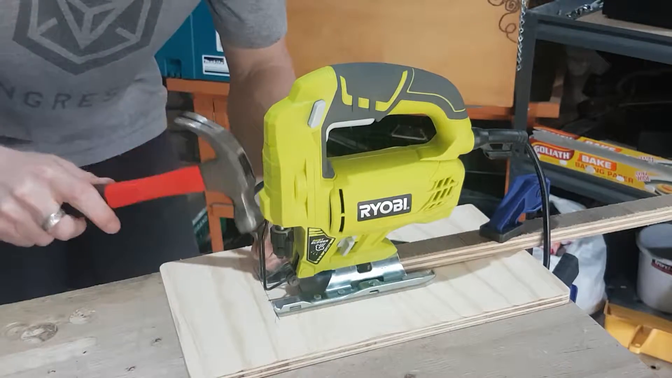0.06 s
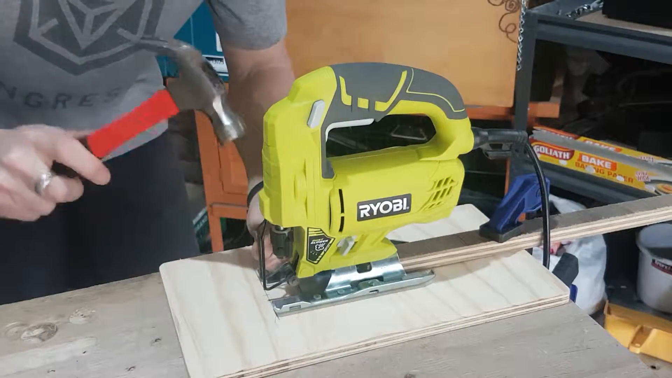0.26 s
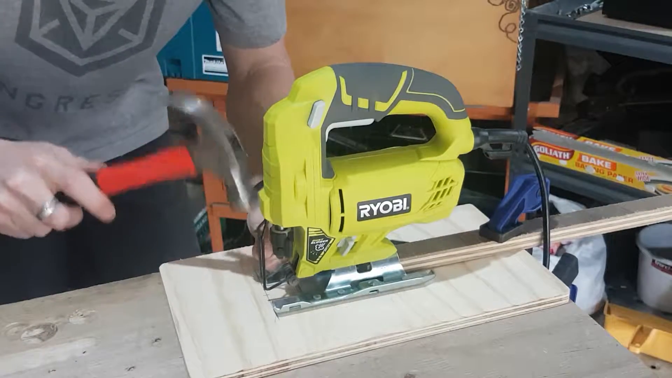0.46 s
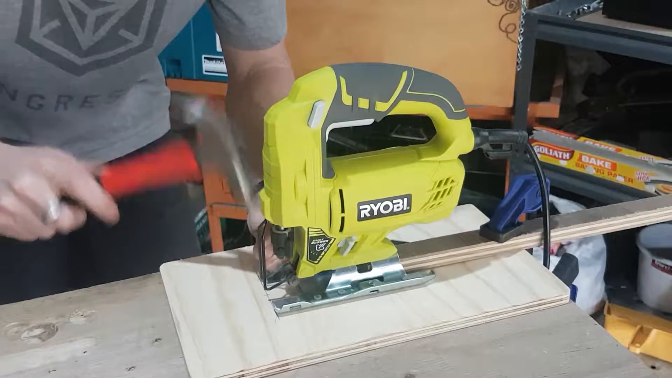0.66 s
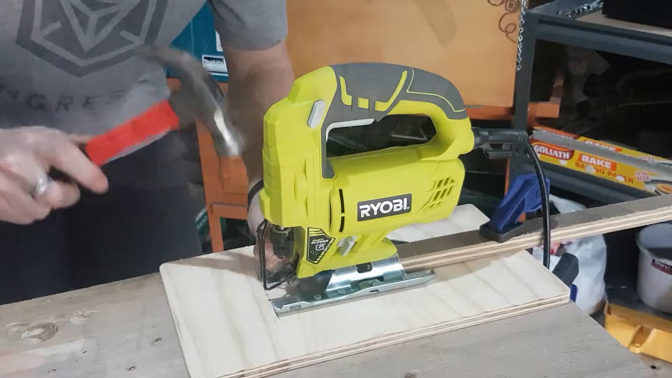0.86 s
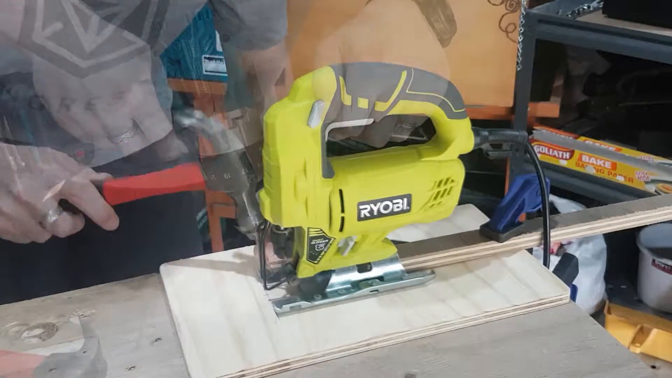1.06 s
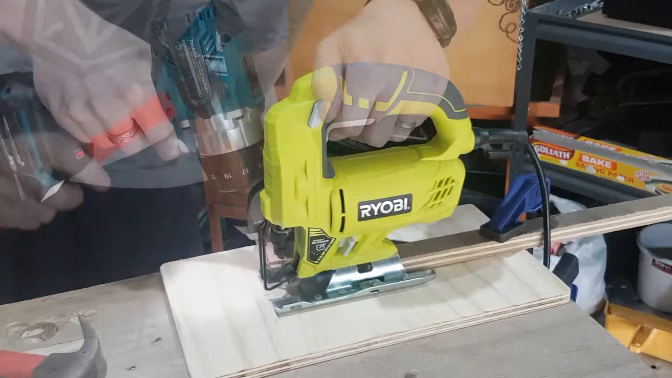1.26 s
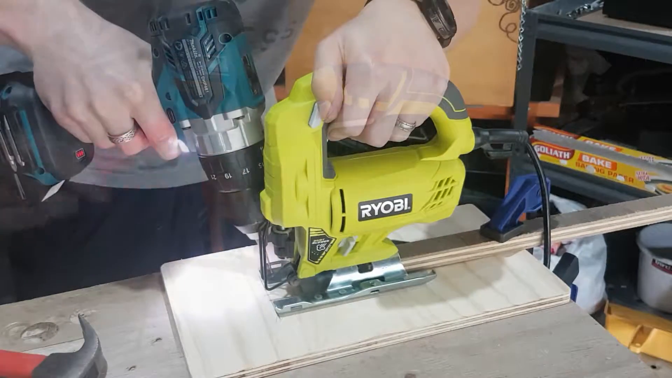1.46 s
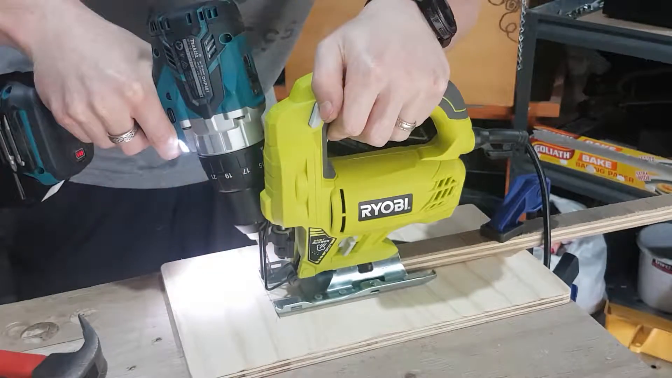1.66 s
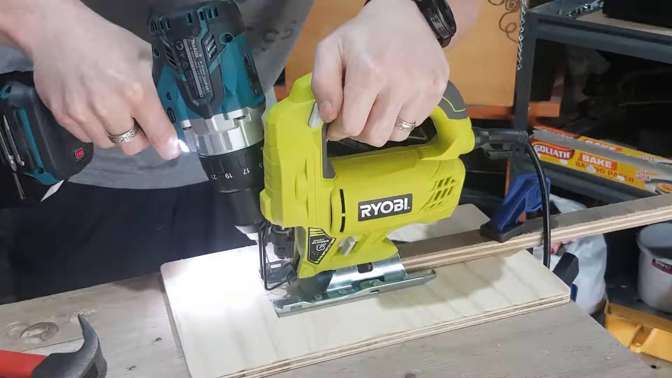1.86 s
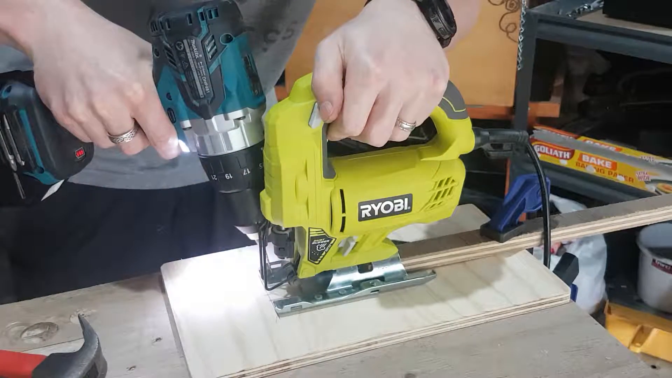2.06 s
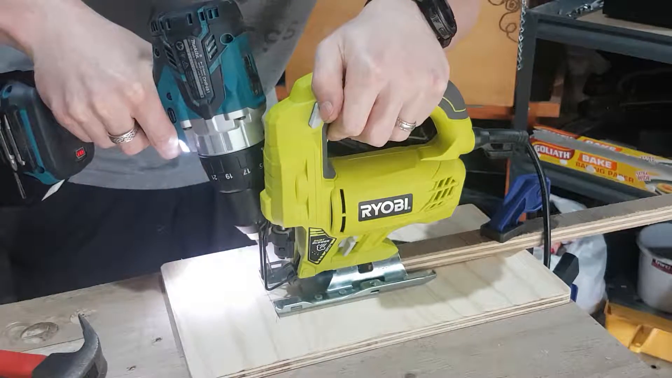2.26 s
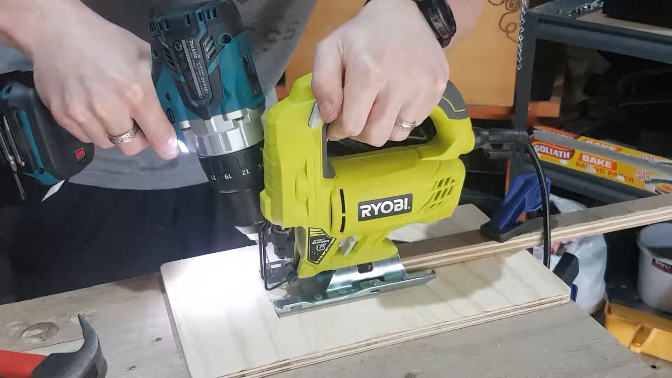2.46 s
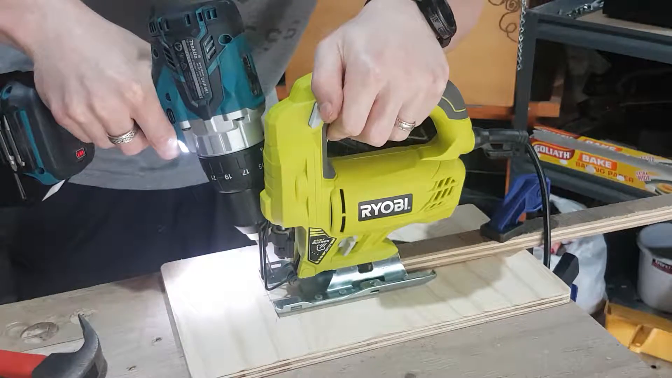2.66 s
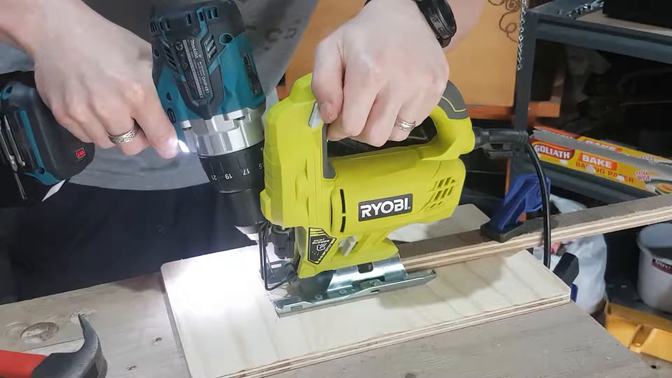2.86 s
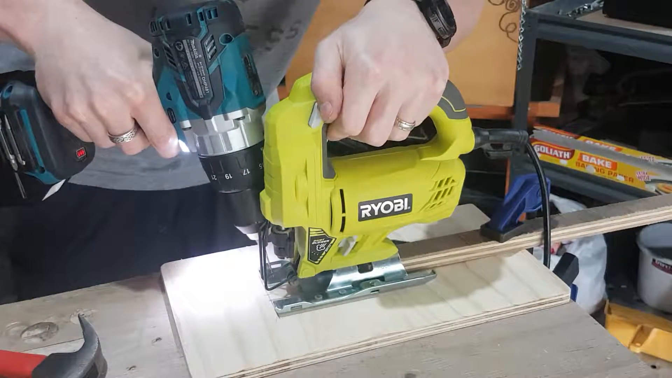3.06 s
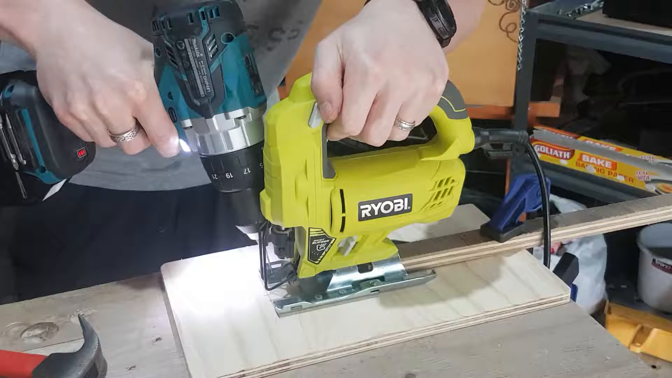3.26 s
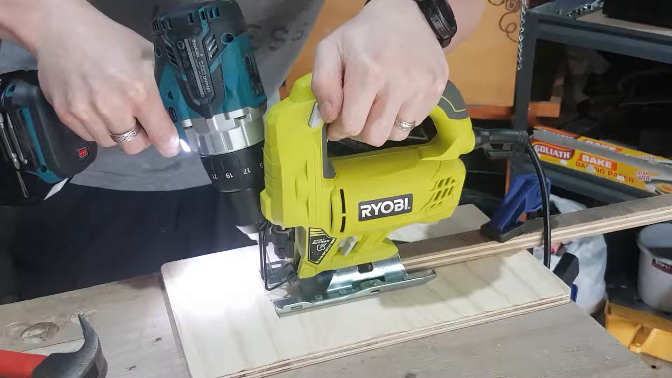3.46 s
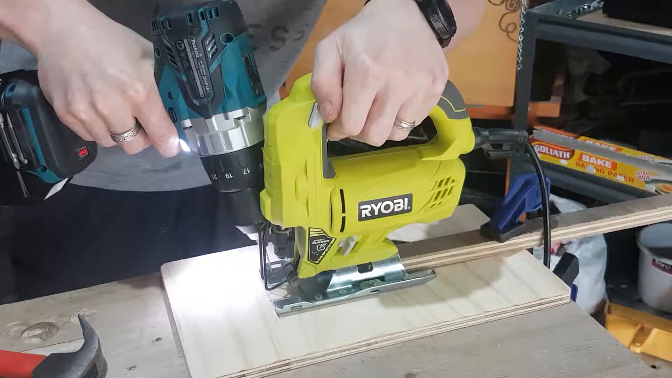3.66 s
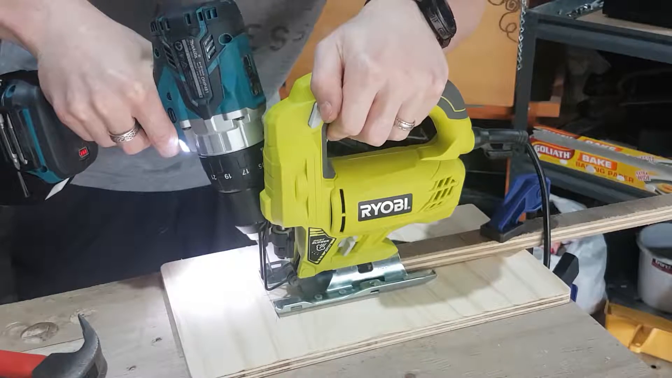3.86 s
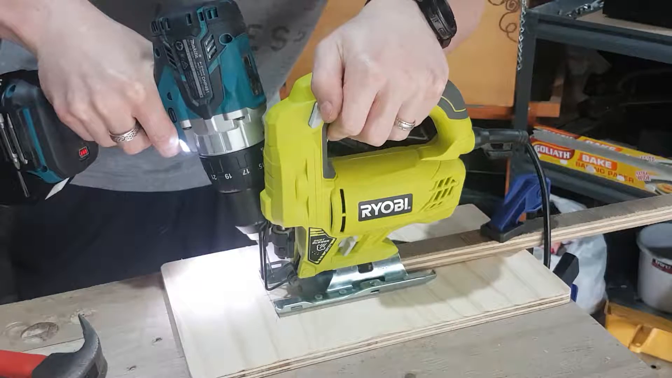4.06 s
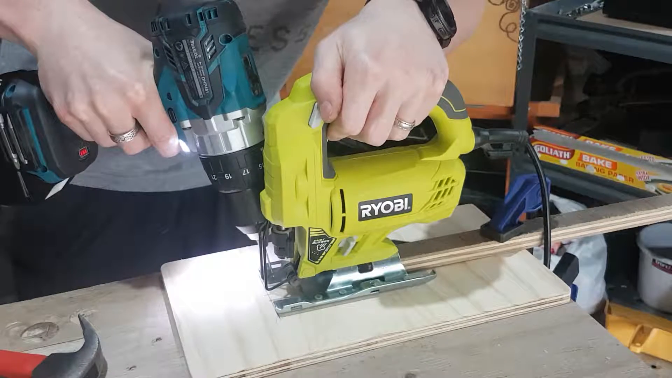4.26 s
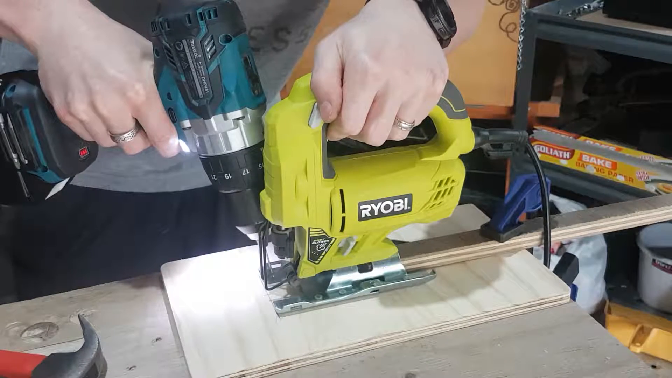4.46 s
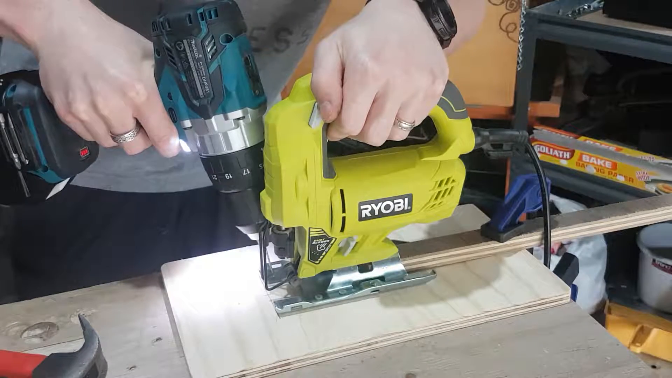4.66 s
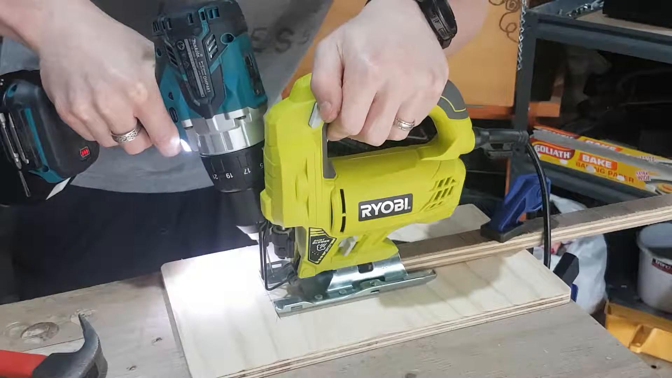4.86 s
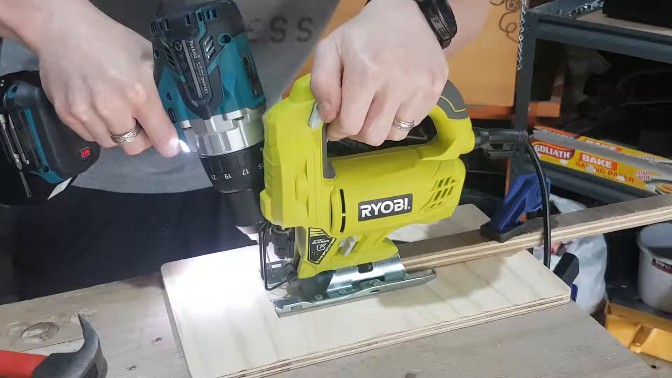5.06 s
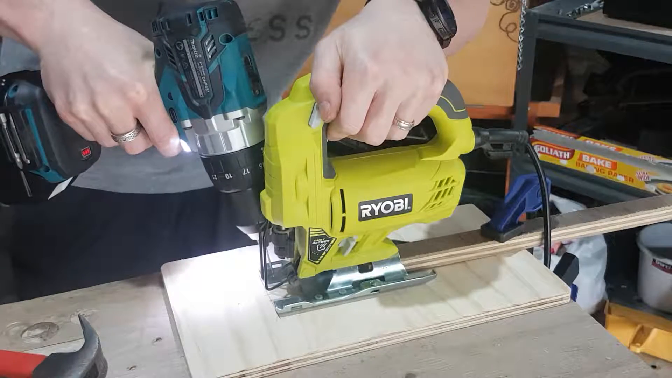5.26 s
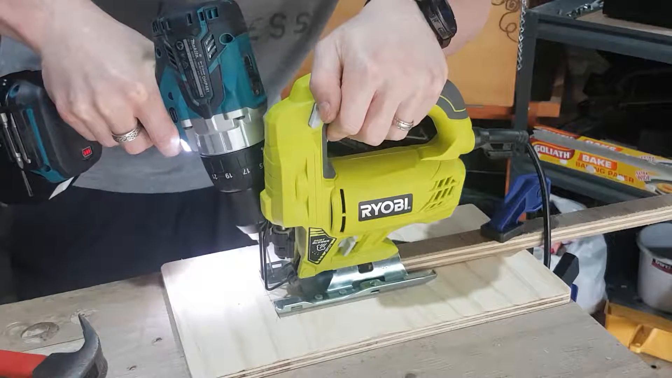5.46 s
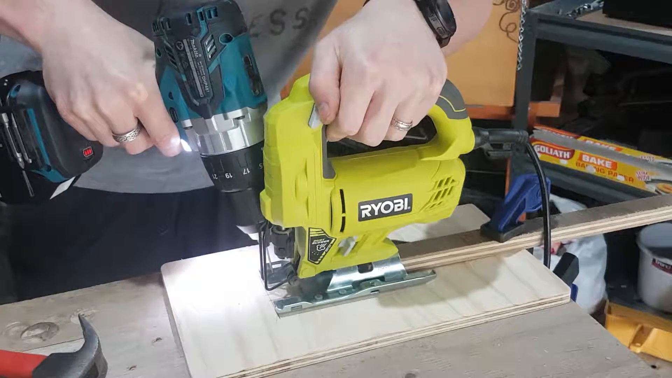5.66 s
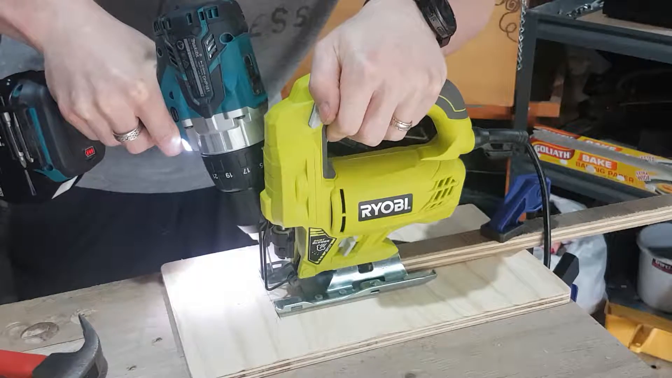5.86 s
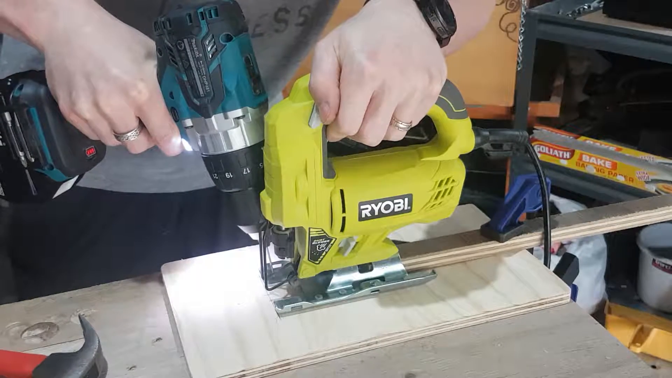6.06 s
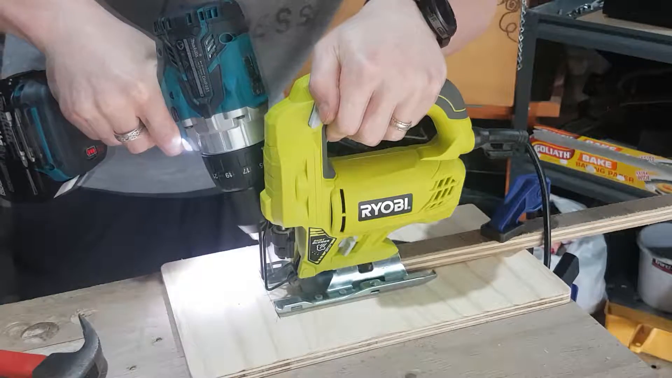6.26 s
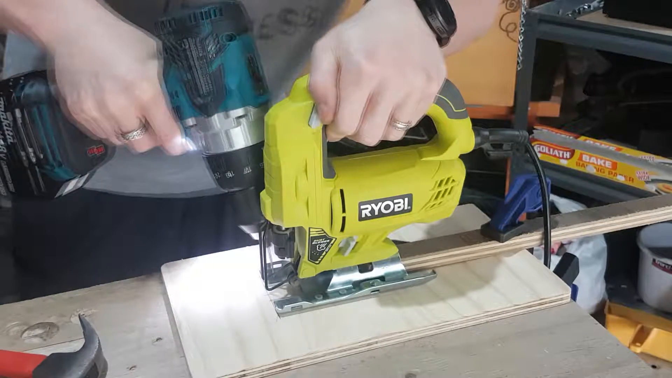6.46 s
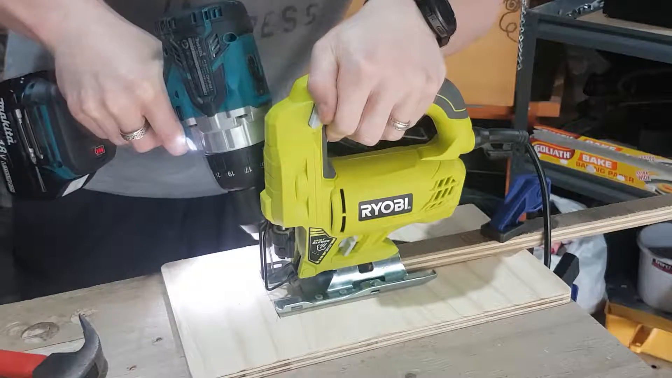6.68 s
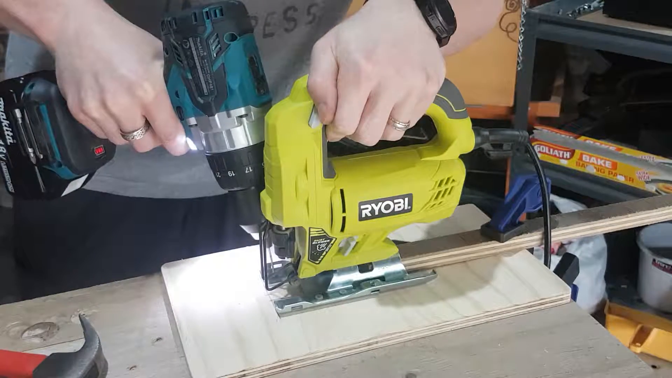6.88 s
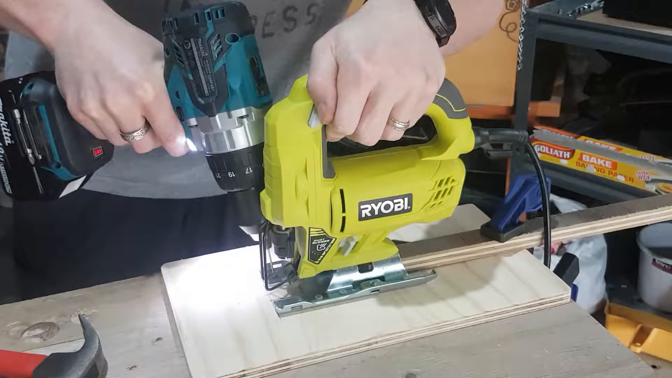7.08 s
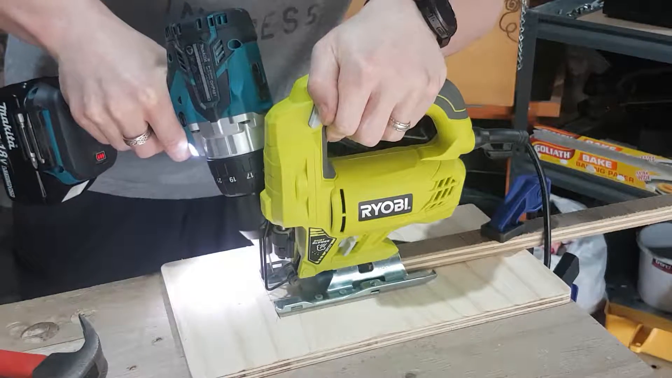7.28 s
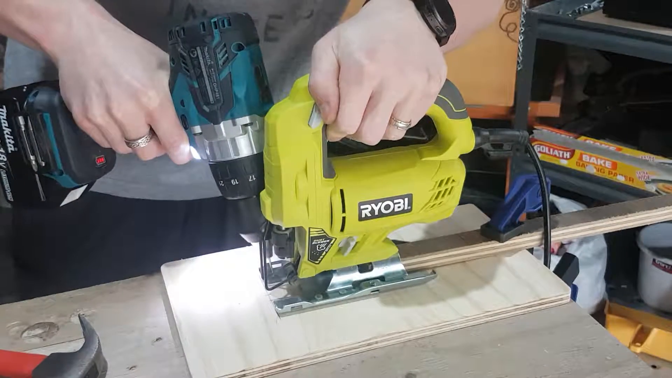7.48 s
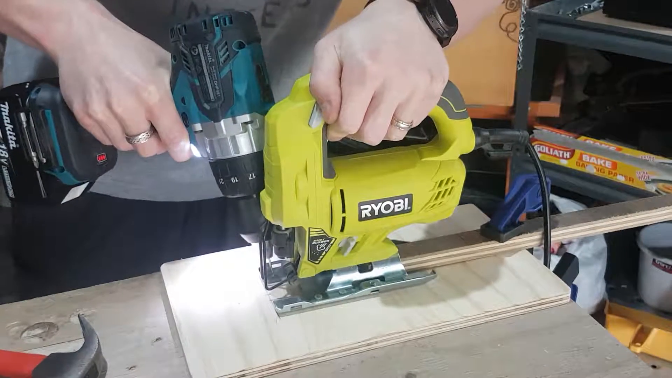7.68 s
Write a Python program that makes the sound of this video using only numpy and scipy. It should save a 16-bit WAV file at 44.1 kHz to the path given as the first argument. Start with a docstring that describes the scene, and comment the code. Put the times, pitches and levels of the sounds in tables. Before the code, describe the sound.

Close by, five evenly spaced hammer taps crack against metal, ringing briefly through a workbench and growing softer. After a small rustle and a faint electronic whistle, a cordless drill spins up in four stages, each higher and louder, with gear noise and airy hiss. It holds full speed, dips slightly and wavers while the bit rubs low in the wood and catches once. Quiet workshop room tone lies underneath.

```python
"""In a small workshop a hammer taps five times, ever more lightly, at the front of a jigsaw on a
plywood bench: steel cracks, bench and saw ring, clothes rustle around the last tap. A cordless drill
whistles faintly, then is run up in four trigger steps: motor orders and switching whistle glide with
the speed while gears and cooling fan grow into a bright rush. At full speed a 10 kHz tone turns rough
and flickers, the level dips briefly, and the bit rubs harder in the wood and catches once."""
import sys
import numpy as np
from scipy import signal
from scipy.fft import rfft, irfft, next_fast_len
from scipy.io import wavfile

SR = 44100
rng = np.random.default_rng(int(sys.argv[2]) if len(sys.argv) > 2 else 0)


def store_wav(level_fs):
    """Save 16-bit WAV to argv[1]."""
    pcm = np.round(np.clip(np.atleast_2d(level_fs), -1, 1) * 32767)
    wavfile.write(sys.argv[1], SR, pcm.T.astype(np.int16))


N = 340452
TIME = np.arange(N) / SR

# hammer hits: t/s, level/dB, thump trim/dB, thump f/Hz, metal brightness/dB, low shelf/dB
BLOWS = [(0.1194, 4.5, -20, 64.4, -0.5, 4.5), (0.43, 1, -6, 58, 6.5, 4.5), (0.7498, -2, 0, 146, 4, 3.5),
         (1.072, -4.5, -13, 140, 3, -24.5), (1.397, -12, -28, 140, 4, -25)]
# ringing modes of bench and saw: f/Hz, level/dB, t60/s
BENCH_MODES = [(164, 1, .38), (183, -5, .2), (277, 3, .45), (351, -1, .28), (395, -2, .38), (511, -3, .3),
               (548, -4, .31), (592, -5, .34), (634, -4, .27), (832, -1, .25), (966, -2, .22),
               (1103, -9, .3), (1257, -4, .22), (1360, -10, .28), (1405, -21, .8), (1615, -9, .22),
               (2019, -9, .2), (2180, -13, .21), (2530, -11, .19), (2790, -12, .3), (2955, -13, .2)]
# colour of a hit's clatter in the room: f/Hz, level/dB
CLATTER_EQ = [(50, -24.5), (110, -12), (180, -13), (225, -13), (290, -9), (600, -14), (730, -14.5),
              (1300, -13.5), (2700, -20), (4500, -27), (6500, -30.5), (9500, -39.5), (13000, -40.5),
              (16000, -45.5)]
# reverb time of the room: f/Hz, t60/s
ROOM_T60 = [(60, 0.13), (160, 0.13), (420, 0.51), (1100, 0.32), (2900, 0.33), (7700, 0.29), (15000, 0.39)]

# trigger steps: t/s, target speed/(turns/s), spin-up/s, share of the rise that settles slowly
TRIGGER = [(2.055, 83.3, .1, 0), (2.855, 223, .024, .46), (3.235, 333, .022, .38),
           (4.838, 437.3, .032, .02)]
# motor whine: multiple of the turn rate, level/dB at each trigger step
ORDERS = [(1, -77, -88, -56, -66), (4, -60.5, -55.5, -57, -47), (6, -88, -80, -64, -73.5),
          (7, -71, -79, -72, -66), (8, -55.5, -65, -53.5, -55), (10, -82, -85, -70, -82),
          (12, -63.5, -68, -66, -64), (20, -70, -57.5, -68, -77), (32, -73, -87, -77, -72),
          (40, -72, -84, -81, -90), (42, -73, -84, -90, -90)]
# controller whistle: multiple of the switching rate, motor order, level/dB at each trigger step
SIDEBANDS = [(1, -4, -80, -58, -62, -71), (1, 4, -59.5, -68, -77, -80), (1, -8, -82, -71, -64, -72),
             (1, -16, -77, -58.5, -66, -71), (2, -4, -74, -84, -85, -85)]
# faders for gear noise, fan hiss, gear mesh and high tone: level/dB at each trigger step
GEAR_NOISE_DB = [-53, -46.5, -41.5, -37.5]
FAN_HISS_DB = [-68, -56.5, -47.3, -40]
MESH_DB = [-64.5, -51.5, -48.5, -54.5]
HIGH_TONE_DB = [-74, -63, -56.5, -45]
# colours of the gear noise and the fan hiss: f/Hz, level/dB
GEAR_EQ = [(60, -24), (110, -12), (200, -20.5), (400, -15), (750, -11.5), (1150, -4), (1700, -1.5),
           (2350, -5), (3000, -2), (3900, -4.5), (5300, -5), (6300, -7.5), (9000, -11), (12000, -61)]
FAN_EQ = [(5000, -24), (8500, -7), (10000, -3), (11200, 0.5), (12500, 0.5), (14500, -1), (16000, -4.5)]
# resonances of the drill's body: f/Hz, width/Hz, lift/dB
HOUSING = [(1280, 95, 2), (1650, 90, 1), (1820, 75, 3), (2010, 25, 6.5), (2024, 18, -1), (2840, 140, 1),
           (3030, 17, 5.5), (3664, 5.8, 14), (4500, 73, 5), (5400, 83, 2.5)]
# brief dip of the drill at full speed: t/s, gain/dB
DIP = [(6.1, 0), (6.28, -2), (6.55, -3.5), (6.88, 1)]
# tones swell and fade at full speed: t/s, motor whine/dB, high tone/dB, flicker depth (0-1)
SWELL = [(4.85, 3, -1.5, 0), (5.15, 4, 5, 0.1), (5.75, 2, 1, .2), (6.05, 4, -1, .7), (6.3, 2, -5.5, 1),
         (7.15, -3, 4, 0.64), (7.4, -2.5, -15, 0.6), (7.52, 0.5, -2, 0.3), (7.72, 2, 2, 0.3)]

# colours of the bit in wood, of the wash and rustle, and of the room tone: f/Hz, level/dB
WOOD_EQ = [(40, -18), (110, 0.5), (200, -20.5), (290, 4), (560, -1), (850, -5), (1500, -22.5), (4000, -32)]
WASH_EQ = [(50, 0.5), (120, 8), (200, -1.5), (330, 3), (600, -12), (1500, -9), (3500, -13.5), (7000, -18.5),
           (15000, -29.5)]
SHOP_EQ = [(25, -12.5), (60, -2.5), (110, -0.5), (200, -6), (330, -2.5), (600, -8), (1800, -7), (2300, -11),
           (3400, -8), (6000, -17), (9000, -25.5), (16000, -36)]
# a soft wash around the first hit, then rustles around the last: start/s, end/s, level/dB
WASH_AND_RUSTLES = [(0, .35, -54.5), (1.253, 1.56, -56), (1.559, 1.613, -48)]
# stereo images of room and drill: f/Hz, left-right correlation
ROOM_IMAGE = [(100, 0.94), (300, 0.91), (550, 0.91), (1000, 0.46), (2500, .15), (6000, 0.054), (12000, .5)]
DRILL_IMAGE = [(100, 1), (400, 0.95), (1000, 0.68), (2500, 0.26), (5000, 0.11), (8000, 0.033), (10000, 1),
               (12000, 1)]

SWITCHING_HZ = 7945
JOLT_TONES_DB, JOLT_GEARS_DB = -17, 10   # a jolt ducks the tones and rattles the gears
STRAIN_MOTOR_DB, STRAIN_MESH_DB = -36, 12   # at full strain the whine thins and the teeth sing out


def hammer(ring_db=-25, tail_db=-15, crack_db=-14, crack_s=.00091, thump_db=-18, thump_s=.0054):
    """Each hit layers the contact, a metal crack, a bench thump, ringing modes and the room's tail."""
    out, age = np.zeros((2, N + SR)), np.arange(SR) / SR
    shared_tail = room_tail(age)
    modes = bench_modes(age)
    for t, level_db, thump_trim_db, thump_hz, metal_db, low_db in BLOWS:
        ring = sum(mode * from_db(rng.normal(0, 1)) for mode in modes)
        tail = (shared_tail + room_tail(age)) / np.sqrt(2)
        body = from_db(ring_db) * ring + from_db(tail_db) * tail + contact(age)
        # a light tap hardly moves the bench
        body += (from_db(low_db) - 1) * filtered(body, 240, "low", order=1)
        # each hit has its own treble lift: the lighter taps sound brighter than the first
        body += (from_db(metal_db) - 1) * filtered(body, 4500, "high", order=1)
        sizzle = filtered(rng.standard_normal((2, SR)), [1200, 12000], "band", order=1)
        crack = from_db(crack_db + metal_db) * sizzle * np.exp(-age / crack_s)
        thump = from_db(thump_db + thump_trim_db) * np.sin(2 * np.pi * thump_hz * age)
        hit = filtered(body, 130, "high") + crack + thump * bump(age / thump_s) * pan(5)
        start = round(t * SR)
        out[:, start:start + SR] += from_db(level_db) * hit
    return out[:, :N]


def contact(age, swing_hz=520, swing_s=.00082, clack_hz=1650, clack_s=.00066, grit_s=.00094):
    """The attack as steel lands: a heavily damped swing of the board, a clack and a burst of grit."""
    swing = np.sin(2 * np.pi * swing_hz * age) * np.exp(-age / swing_s)
    clack = from_db(-3) * np.sin(2 * np.pi * clack_hz * age) * np.exp(-age / clack_s)
    grit = filtered(noise(CLATTER_EQ, ROOM_IMAGE, size=SR), 900, "high", order=1)
    return from_db(-11) * grit * np.exp(-age / grit_s) - swing - clack


def bench_modes(age):
    """Bench and saw ring as damped sines whose left and right phases part towards the treble."""
    modes = []
    for hz, db, t60 in BENCH_MODES:
        width_rad = np.arccos(at_hz(ROOM_IMAGE, hz))
        phase = rng.uniform(0, 2 * np.pi) + spread(rng.choice([-1, 1]) * width_rad)
        modes.append(np.sin(2 * np.pi * hz * age + phase) * from_db(db - 60 * age / t60))
    return modes


def room_tail(age, colour_db=3):
    """Dense reflections of a hit, coloured by the bench's modes, each octave dying at its own rate."""
    size = len(age)
    colour = [(hz, 26 + .02 * hz, colour_db) for hz, _, t60 in BENCH_MODES if t60 < .6]
    spectrum = rfft(noise(CLATTER_EQ, ROOM_IMAGE, size=size, peaks=colour))
    octave = np.log2(np.clip(np.fft.rfftfreq(size, 1 / SR), 62.5, 16000) / 62.5)
    tail = 0
    for k in range(9):
        band = irfft(spectrum * np.maximum(1 - abs(octave - k), 0), size)
        tail += band * from_db(-60 * age / at_hz(ROOM_T60, 62.5 * 2 ** k))
    return tail


def drill():
    """The drill bus: motor speed sets the pitches, the trigger's position rides the faders."""
    speed, target, strain = spin_up()
    angle = 2 * np.pi * np.cumsum(speed * (1 + .0005 * drift(12))) / SR
    jolt = jolts()
    dip_db, = automation(DIP)
    whine_db, high_db, flicker_depth = automation(SWELL)
    motor_tones = from_left(motor(speed, target, angle, whine_db + STRAIN_MOTOR_DB * strain))
    whines = gear_mesh(speed, target, angle, strain) + high_tone(target, angle, high_db, flicker_depth)
    tones = from_db(JOLT_TONES_DB * jolt) * (motor_tones * pan(.4) + whines * pan(.86))
    return fade_in() * from_db(dip_db) * (tones + rush(target, angle, jolt)) + idle_whistle()


def spin_up(squeeze_s=.069, settle_s=.115, sag_turns_per_s2=.78):
    """The motor chases the trigger: speed and target in turns/s, and strain, the share it lags by."""
    speed, target, before = 0, 0, 0
    for t, turns, quick_s, slow_share in TRIGGER:
        age = np.maximum(TIME - t, 0)
        to_go = (1 - slow_share) * np.exp(-age / quick_s) + slow_share * np.exp(-age / settle_s)
        speed += (turns - before) * (1 - to_go)
        target += (turns - before) * np.minimum(age / squeeze_s, 1)
        before = turns
    strain = np.clip(1 - speed / np.maximum(target, 1), 0, 1)
    sag = sag_turns_per_s2 * age   # after the last step the speed sinks a little
    return speed - sag, target, strain


def jolts(rise_s=.016):
    """Each squeeze shocks the gear train (0-1), most when the step is large against the new speed."""
    jolt, before = 0, 0
    for t, turns, *_ in TRIGGER:
        jolt += (1 - before / turns) ** 2 * bump(np.clip((TIME - t) / rise_s, 0, 50))
        before = turns
    return jolt


def fade_in(rise_s=.11):
    """Gain that builds from 0 to 1 once the motor starts."""
    return 1 - np.exp(-np.maximum(TIME - TRIGGER[0][0], 0) / rise_s)


def motor(speed, target, angle, whine_db):
    """Orders of rotor and gears, and the controller's switching whistle split by the rotation."""
    whine, whistle = 0, 0
    for order, *levels in ORDERS:
        level_db = at_step(target, levels) + gearbox_db(order * speed)
        whine += tone(order * angle, level_db, waver_db=1.43, shimmer_rad=.09)
    carrier = 2 * np.pi * SWITCHING_HZ * TIME
    for k, order, *levels in SIDEBANDS:
        level_db = at_step(target, levels) + gearbox_db(k * SWITCHING_HZ + order * speed)
        whistle += tone(k * carrier + order * angle, level_db, waver_db=3.5, shimmer_rad=.15)
    return from_db(whine_db + .5) * whine + from_db(-3.5) * whistle


def gearbox_db(hz):
    """Tones swell as they glide through the gearbox's resonance."""
    return bell(hz, centre_hz=3354, width_hz=520, lift_db=6)


def rush(target, angle, jolt):
    """Gear noise and fan hiss grow with each step and pulse with the rotor and the chuck."""
    pulsing = 1 + .05 * np.sin(4 * angle) + .045 * np.sin(angle / 7)
    gear_db = at_step(target, GEAR_NOISE_DB) + JOLT_GEARS_DB * jolt
    gears = from_db(gear_db) * noise(GEAR_EQ, DRILL_IMAGE, peaks=HOUSING)
    # turning slowly, the gears lack their midrange growl
    scoop = np.interp(target, [90, 200], [.86, 0])
    gears -= scoop * filtered(gears, [1100, 2300], "band", order=1)
    hiss_db = at_step(target, FAN_HISS_DB) + .73 * drift(150)
    hiss = fade_in() * from_db(hiss_db) * noise(FAN_EQ, DRILL_IMAGE)
    return pulsing * (from_left(gears) * pan(.59) + hiss * pan(-.45))


def gear_mesh(speed, target, angle, strain, order=16):
    """The teeth sing, biting unevenly as the train goes round, louder while they speed the chuck up."""
    bite = 1 + .4 * np.sin(angle / 8 + drift(10))
    level_db = at_step(target, MESH_DB) + gearbox_db(order * speed) + STRAIN_MESH_DB * np.sqrt(strain)
    return from_left(bite * tone(order * angle, level_db, waver_db=1.7, shimmer_rad=.2))


def high_tone(target, angle, swell_db, flicker_depth, order=23, left_lead_rad=1.5):
    """A tone that climbs with the motor to 10 kHz, then turns rough and flickers at full speed."""
    phase = order * angle + 1.3 * flicker_depth * drift(60) + spread(left_lead_rad)
    flicker = 1 + flicker_depth * np.tanh(3 * drift(14))
    level_db = at_step(target, HIGH_TONE_DB) + swell_db
    return flicker * tone(phase, level_db, waver_db=1, shimmer_rad=.1) * pan(1.2)


def bit(full_s=6.85, full_db=-61, rise_db_per_s=11, catch_s=7.09, catch_db=-50, catch_rise_s=.055):
    """Low rubbing as the bit sinks into the wood: it grows, holds, and swells once where it catches."""
    rubbing = from_db(full_db - rise_db_per_s * np.maximum(full_s - TIME, 0))
    catch = from_db(catch_db) * bump(np.maximum(TIME - catch_s, 0) / catch_rise_s)
    return (rubbing + catch) * from_db(1.5 * drift(30)) * noise(WOOD_EQ, ROOM_IMAGE)


def idle_whistle(level_db=-78, split_hz=91):
    """With the trigger barely pressed the controller gives a faint pair of high tones."""
    held = np.interp(TIME, [1.25, 1.29, 2.1, 2.18], [0, 1, 1, 0])
    pair_hz = SWITCHING_HZ - split_hz, SWITCHING_HZ + split_hz
    return held * sum(tone(2 * np.pi * hz * TIME, level_db, waver_db=-1, shimmer_rad=.4) for hz in pair_hz)


def wash_and_rustle(fade_s=.012):
    """A low, soft wash of noise around the first hit; hands and clothes rustle around the last."""
    level = 0
    for start, end, db in WASH_AND_RUSTLES:
        inside_s = np.minimum(TIME - start, end - TIME)
        level += from_db(db) * np.clip(.5 + inside_s / fade_s, 0, 1)
    return level * from_db(1.1 * drift(25)) * noise(WASH_EQ, ROOM_IMAGE)


def room_tone(level_db=-61.5):
    """The workshop's quiet, steady bed."""
    return from_db(level_db) * noise(SHOP_EQ, ROOM_IMAGE, ripple_db=2)


def tone(phase, level_db, waver_db, shimmer_rad):
    """A partial that wavers as the hand moves the drill, its phase wandering apart left and right."""
    wave = np.sin(phase + shimmer_rad * drift(41) + .54 * np.array([drift(1.3), drift(1.8)]))
    return np.sqrt(2) * from_db(level_db + waver_db * drift(8.5)) * wave


def noise(eq, image, size=N, ripple_db=0, peaks=()):
    """Stereo noise of rms 1 with resonant peaks; the ripple stands for many weaker resonances."""
    padded = next_fast_len(size, True)
    hz = np.fft.rfftfreq(padded, 1 / SR)
    mid, side = rfft(rng.standard_normal((2, padded)))
    alike = np.clip(at_hz(image, hz), -.99, .99)
    pair = np.sqrt(1 + alike) * mid + np.sqrt(1 - alike) * side * [[1], [-1]]
    knots = np.geomspace(200, 16000, 260)
    ripple = ripple_db * np.interp(hz, knots, rng.standard_normal(len(knots)))
    colour_db = at_hz(eq, hz) + ripple + sum(bell(hz, *peak) for peak in peaks)
    return rms_one(irfft(pair * from_db(colour_db), padded)[:, :size])


def drift(rate_hz, hop=64, size=8192):
    """Smooth random modulator of spread 1 that changes about rate_hz times a second."""
    hz = np.fft.rfftfreq(size, hop / SR)
    slow = irfft(rfft(rng.standard_normal(size)) / (1 + (hz / rate_hz) ** 2))
    return np.interp(np.arange(N) / hop, np.arange(size), rms_one(slow - slow.mean()))


def bump(x):
    """Envelope that peaks at 1 when x is 1, then dies away."""
    return x * np.exp(1 - x)


def bell(hz, centre_hz, width_hz, lift_db):
    """Bell EQ curve in dB."""
    return lift_db / (1 + (2 * (hz - centre_hz) / width_hz) ** 2)


def filtered(x, hz, kind, order=2):
    """Causal Butterworth filter."""
    return signal.sosfilt(signal.butter(order, hz, kind, fs=SR, output="sos"), x)


def at_step(target, levels):
    """Crossfade per-step levels by the trigger's position."""
    return np.interp(target, [turns for _, turns, *_ in TRIGGER], levels)


def at_hz(points, hz):
    """Read a table on a log-frequency axis."""
    known_hz, values = np.transpose(points)
    return np.interp(np.log(hz + 1e-3), np.log(known_hz), values)


def automation(rows):
    """One lane per column after the time, sample by sample."""
    times, *columns = np.transpose(rows)
    return [np.interp(TIME, times, column) for column in columns]


def spread(difference):
    """Split a difference: half up on the left, half down on the right."""
    return difference * np.array([[.5], [-.5]])


def pan(db):
    """Stereo gains; positive leans left."""
    return from_db(spread(db))


def from_left(x, lag_s=2 / SR):
    """Nudge a sound to the left by delaying its right side."""
    return np.array([x[0], np.interp(TIME - lag_s, TIME, x[1])])


def from_db(db):
    """Decibels to gain."""
    return 10 ** (np.asarray(db) / 20)


def rms_one(x):
    """Scale to rms 1."""
    return x / np.sqrt(np.mean(x ** 2) + 1e-20)


def scene():
    """Hammer, then drill, over the quiet of the shop."""
    return room_tone() + hammer() + drill() + bit() + wash_and_rustle()


def record(dry, cutoff_hz=15750):
    """Master bus: a soft clip flattens the hardest hits, a steep low-pass trims the top."""
    clipped = dry / (1 + dry ** 8) ** (1 / 8)
    return signal.sosfilt(signal.ellip(12, .1, 80, cutoff_hz, fs=SR, output="sos"), clipped)


dry = scene()
out = record(dry)
store_wav(out)
```